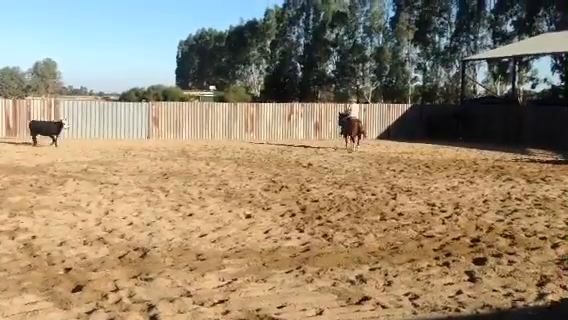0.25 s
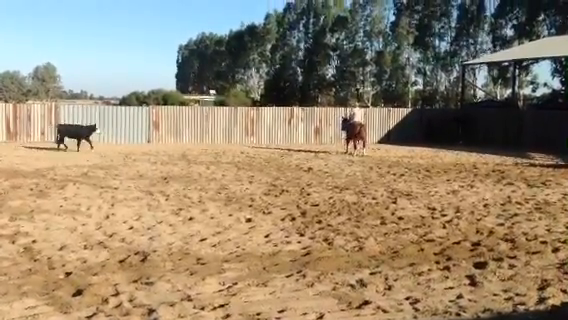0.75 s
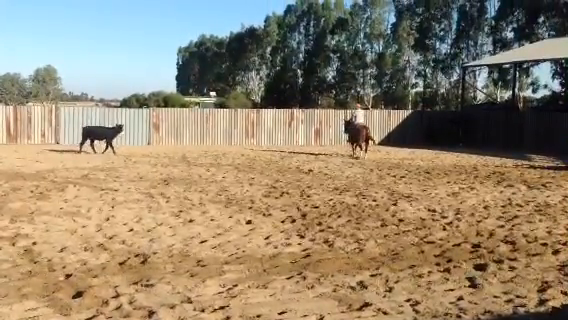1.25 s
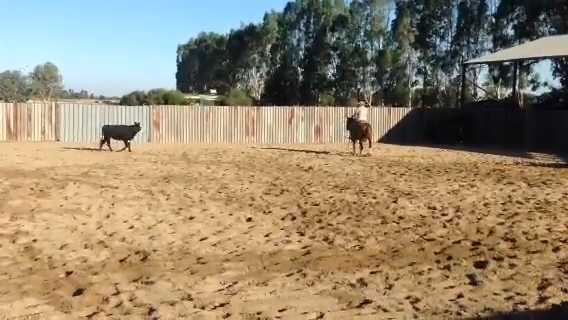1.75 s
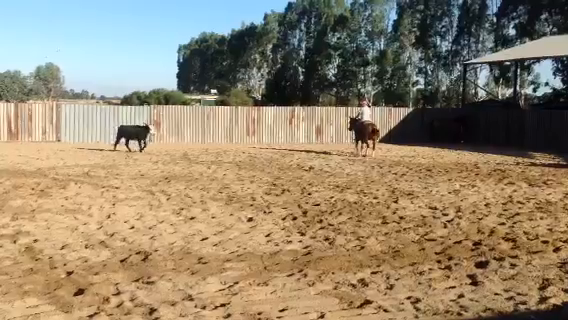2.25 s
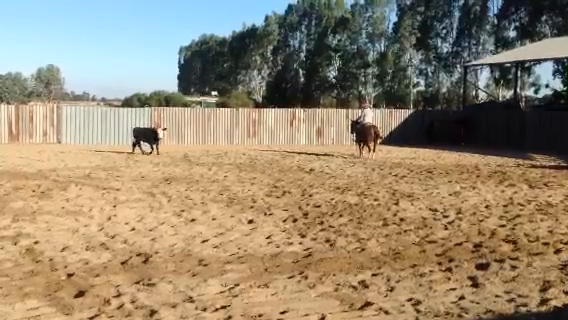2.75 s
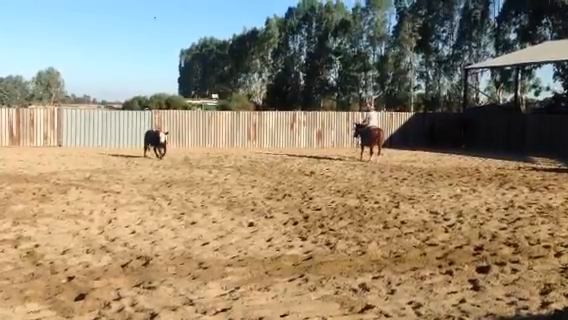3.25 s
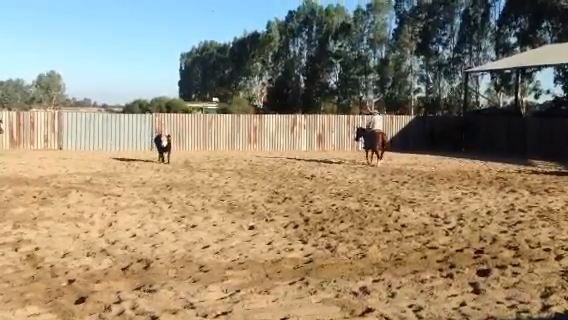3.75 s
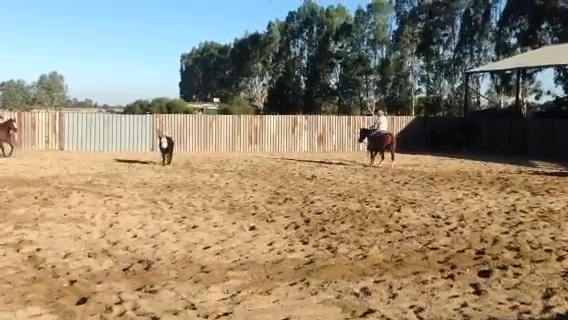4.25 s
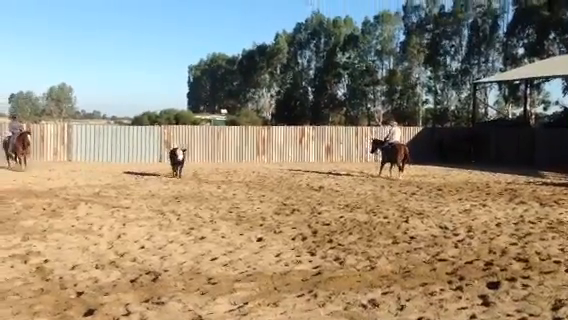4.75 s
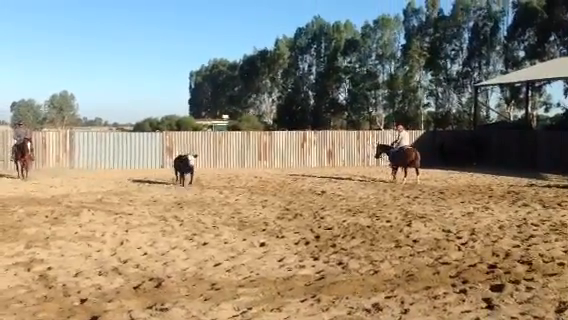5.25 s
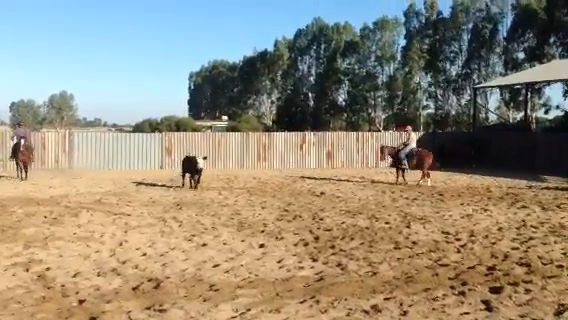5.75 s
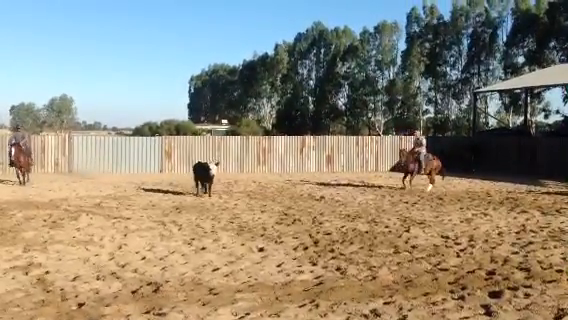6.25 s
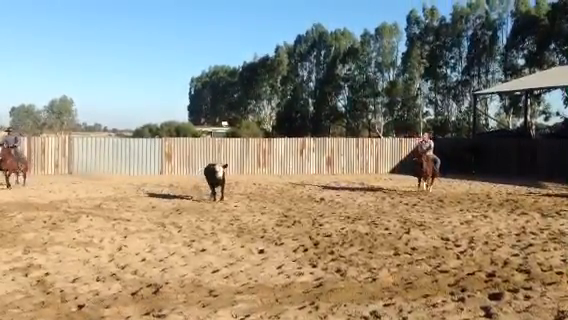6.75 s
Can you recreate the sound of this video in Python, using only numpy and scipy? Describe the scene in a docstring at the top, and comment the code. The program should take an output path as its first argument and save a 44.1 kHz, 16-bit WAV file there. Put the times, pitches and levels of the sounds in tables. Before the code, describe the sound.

Outdoors, a horse whistles out a trembling high neigh that cracks, sags and sputters away into low nickers, followed by quiet air and sparse clicks.

```python
"""Hooves thud in the sand of a fenced arena, over a quiet outdoor hush and a very faint tone near 2 kHz; then a
horse whinnies: a high whistle (jittered oscillator), joined by a lower wavering voice (fraying harmonics),
breaks into squeaks, a groan and a rough rattle (pulses and air in throat resonances) and ends in two soft
nickers. Tack clicks (filtered noise), wood knocks (decaying modes), a small bird chips far off (gliding sine).
All but the thuds and the hush come back from ground and fence by discrete echoes and a thin noise tail."""
import sys
import numpy as np
from scipy import signal
from scipy.fft import rfft, irfft
from scipy.io import wavfile

SR = 44100
rng = np.random.default_rng(int(sys.argv[2]) if len(sys.argv) > 2 else 0)


def generate_wav(sig):
    """Save sig (samples, or channels by samples) to the path in sys.argv[1] as 16-bit PCM at SR."""
    pcm = np.round(np.clip(np.atleast_2d(sig).T, -1, 1) * 32767).astype(np.int16)
    wavfile.write(sys.argv[1], SR, pcm)


N = 309141
TIME = np.arange(N) / SR  # s
FREQ = np.fft.rfftfreq(N, 1 / SR) + 1e-3  # Hz, kept off zero for the divisions
LN_60_DB = np.log(1000)  # a fall of 60 dB, in nepers


def undb(db):
    """Decibels to gain."""
    return 10 ** (np.asarray(db) / 20)


def unit(x):
    """Scale to standard deviation 1."""
    return x / np.std(x)


def track(rows, axis):
    """One column of a curve, read at every sample."""
    rows = np.array(rows)
    return np.interp(TIME, rows[:, 0], rows[:, axis])


def sounding(rows):
    """Gate that is open between the first and last time of a curve."""
    return (TIME > rows[0][0]) * (TIME < rows[-1][0])


def colour_db(points, hz):
    """Read a spectrum on a log-frequency axis."""
    f, db = np.transpose(points)
    return np.interp(np.log(hz), np.log(f), db)


def shape(x, gain):
    """Filter by a gain per frequency, then level to spread 1."""
    return unit(irfft(rfft(x) * gain, N))


def resonance(hz, width):
    """Gain of a steep resonance: a band-pass applied twice."""
    return 1 / (1 + ((FREQ ** 2 - hz ** 2) / (FREQ * width)) ** 2)


def noise():
    """White noise."""
    return rng.standard_normal(N)


def walk(rate, size=16384):
    """Smooth bounded chance with spread 1, changing about rate times a second."""
    slow = irfft(rfft(rng.standard_normal(size)) / (1 + (FREQ[:size // 2 + 1] / rate) ** 4))
    bounded = unit(np.tanh(.5 * unit(slow)))
    return np.interp(TIME, np.linspace(0, TIME[-1], size), bounded)


def turn(hz):
    """Phase of an oscillator, in radians."""
    return 2 * np.pi * np.cumsum(hz) / SR


def ramp(start, length):
    """Rise from 0 to 1 in a straight line."""
    return np.clip((TIME - start) / length, 0, 1)


def envelope(start, attack, hold, release):
    """A straight rise, a hold and an exponential fall."""
    fall = np.exp(-np.clip((TIME - start - attack - hold) / release, 0, 50))
    return ramp(start, attack) * fall


def pulses(phase, scatter_db):
    """One pulse of uneven strength for each turn of a phase."""
    ticks = np.diff(np.floor(phase / (2 * np.pi)), prepend=0)
    return unit(ticks * undb(scatter_db * walk(100)))


def whistle(curve, own_tilt_db, shimmer_db=3, hiss_db=-17):
    """A high oscillator: brighter and clearer at first, then trembling, duller and wrapped in a narrow hiss."""
    # overtones of the whistle: multiple, level/dB
    overtones = [(1, 0), (2, -13.5), (3, -25.5), (4, -28.5), (5, -40)]
    early_rough, late_rough = 0.36, 0.75
    # about half a second into the call the whistle quickly turns rougher
    rough = early_rough + (late_rough - early_rough) * ramp(0.99, 0.06)
    blowing = ramp(0.63, 0.22)
    jitter = 0.009 * walk(70) + 0.009 * blowing * walk(350)
    phase = turn(track(curve, 1) * (1 + rough * jitter))
    # the whistle cracks into a duller register, 6 dB per octave darker
    tilt_db = own_tilt_db - 6 * ramp(0.755, .01)
    tone = np.zeros(N)
    for multiple, db in overtones:
        tone += undb(db + tilt_db * np.log2(multiple)) * np.sin(round(multiple) * phase)
    tone = tone * undb(2.0 + shimmer_db * rough * walk(99))
    hiss = shape(noise(), resonance(1950, 1000) + undb(-21) * resonance(5400, 1200))
    return (tone + undb(hiss_db) * blowing * hiss) * undb(track(curve, 2)) * sounding(curve)


def voice(flap, tilt_db=0.17, rough=.18, fray_rad=.11):
    """The vocal folds quaver in uneven arches; flapping adds faint sidebands."""
    # the lower voice swells in and quavers: t/s, f/Hz, level/dB
    quaver = [(0.86, 685, -53), (0.914, 692.4, -47), (0.948, 656.5, -50), (1.0, 713, -46),
              (1.032, 712, -41), (1.068, 731.5, -46.5), (1.09, 670, -42), (1.122, 685.7, -48.5),
              (1.165, 736.7, -44.5), (1.202, 721.8, -39.5), (1.225, 692.4, -41), (1.252, 655, -45.5),
              (1.296, 684.6, -40), (1.33, 706.7, -38), (1.355, 698, -45), (1.378, 680, -72)]
    # colour of the lower voice, read at each harmonic: f/Hz, level/dB
    colour = [(650, -0.5), (720, -0.5), (1100, -6), (1340, 2.5), (1460, 0.5), (1700, -27), (2140, 11.5),
              (2450, -19), (2850, -2), (3080, -8), (3550, -10.5), (4200, -12.5), (4600, -19.5), (5200, -18),
              (6000, -26.5), (8100, -26.5), (9000, -42)]
    hz = track(quaver, 1) + 4 * walk(30)  # pitch wanders by 4 Hz
    phase = turn(hz * (1 + 0.005 * walk(410) + 0.006 * walk(85)))
    tone = np.zeros(N)
    # each harmonic flickers and frays on its own, the high ones most
    for k in np.arange(1, 13):
        flicker_db = 2 * np.sqrt(k) * walk(31)
        db = colour_db(colour, k * hz) + tilt_db * np.log2(k) + flicker_db
        tone += undb(db) * np.sin(k * phase + fray_rad * (k - 1) * walk(90))
    roughness = 1 + rough * (np.sin(flap) + walk(110))
    return tone * roughness * undb(track(quaver, 2)) * sounding(quaver)


def squeaks(wobble_rad=0.38, overtone_db=-23, arch=.025):
    """The voice catches and breaks in short squeaks, each an arch of pitch under a bell-shaped envelope."""
    # squeaks, timed at their middles: t/s, f/Hz, level/dB, length/s, glide/(Hz/s)
    catches = [(1.115, 2030, -31, .007, -5), (1.168, 2120, -24.5, 0.0073, 0), (1.242, 2020, -25, 0.006, 0),
               (1.276, 2090, -23.5, 0.006, 0), (1.302, 2120, -23.5, 0.01213, 0),
               (1.322, 630, -39, .0094, -3000), (1.363, 1900, -32, 0.024, -7000),
               (1.37, 1230, -35.5, 0.0191, -2000), (1.387, 1755, -33, .022, 0),
               (1.398, 1495, -31.5, 0.04, -1000), (1.413, 3730, -43.5, .05, 3),
               (1.426, 2130, -31, .035, 2000), (1.437, 1760, -25, 0.038, -7),
               (1.465, 1480, -35, 0.019, -3000), (1.468, 2080, -36, .02, -1500),
               (1.476, 1330, -37, 0.023, -3500), (1.524, 3700, -50, 0.046, 4),
               (2.232, 1792, -40.5, 0.008, 0), (2.353, 1850, -39, 0.0056, 0),
               (2.374, 1710, -39.5, 0.0068, -2), (2.692, 718, -44.5, 0.027, -2500),
               (2.837, 1750, -44, 0.0056, 0), (2.843, 3350, -53, 0.019, 0)]
    wobble = wobble_rad * walk(150)
    out = np.zeros(N)
    for at, hz, db, length, glide in catches:
        near = np.abs(TIME - at) < 2 * length
        t = TIME[near] - at
        edge = (2 * t / length) ** 2
        # the pitch droops by the share arch half a length from the middle
        phase = turn(hz * (1 - arch * edge) + glide * t) + wobble[near]
        tone = np.cos(phase) + undb(overtone_db) * np.cos(2 * phase)
        out[near] += undb(db) * np.exp(-edge) * tone
    return out


def groan(start_s=1.318, start_hz=605, sag_hz_per_s=364, level_db=-39, jitter=0.064, shimmer_db=4):
    """The lower, rougher note that the voice collapses to; it sags as it fades."""
    hz = start_hz - sag_hz_per_s * np.clip(TIME - start_s, 0, .5)
    tone = np.sin(turn(hz * (1 + jitter * walk(131)))) * undb(shimmer_db * walk(115))
    return undb(level_db) * tone * envelope(start_s, 0.0097, 0.12, 0.033)


def flutter(hz=250, jitter=.13, rattle_hz=46, rattle_jitter=.26):
    """Slack folds flap unevenly, in slower rattling groups: the phase of each."""
    flap = turn(hz * (1 + jitter * walk(113.5)))
    rattle = turn(rattle_hz * (1 + rattle_jitter * walk(40.7)))
    return flap, rattle


def nicker(flap, rattle, rumble_db=-6, lowest_hz=100, soft_hz=1800, patchy_db=3, wander=.02):
    """Flaps of the folds and puffs of air ring a restless throat; the chest growls, all beating with the rattle."""
    # rattling pushes of air that end the whinny and make the nickers:
    # t/s, hold/s, mouth level/dB, chest flutter level/dB, brightness/(dB/octave)
    pushes = [(1.334, 0.024, -36.5, -60.5, -0.5), (1.415, 0.013, -43.5, -42.5, 2.5),
              (1.488, 0.019, -47.5, -46, 4), (1.54, 0.0041, -52, -40.5, -2), (1.604, 0.013, -51.5, -64, 0),
              (2.186, 0.06, -51.5, -51.5, -2), (2.292, 0.027, -53, -62, 5.5), (2.639, 0.041, -50, -51.5, 0),
              (2.73, 0.031, -56.5, -64, 2), (2.792, 0.045, -52.5, -48, 1.5)]
    # resonances of throat and mouth: f/Hz, width/Hz, level for its width/dB
    throat = [(512, 180, -1), (725, 110, 1), (1350, 310, 0), (1750, 180, -1), (2140, 180, 5),
              (2100, 1340, 0), (2415, 120, 0.5), (3400, 330, -5), (3710, 270, -6), (4220, 1000, -12.5),
              (6370, 2140, -14), (10060, 1100, -38)]
    attack_s, mouth_release_s, chest_release_s = 0.028, 0.069, 0.015
    air_db, rattle_depth, sputter_db = 3, .55, 2
    rattle_top_hz = 3800  # above this the rattle beats the resonances less and less
    _, _, mouth_db, chest_db, tilt_db = np.transpose(pushes)
    centre, width, db = np.transpose(throat)

    beat = np.exp(rattle_depth * np.cos(rattle))
    flaps = shape(pulses(flap, 0.67), 1 / (1 + (FREQ / soft_hz) ** 4))
    puffs = unit(noise() * np.exp(.5 * np.cos(flap)))
    source = rfft(flaps + undb(air_db) * puffs)

    # share of each resonance in each push; the shares of a push add up to its mouth level
    octaves = np.log2(np.clip(centre, 500, 4000) / 1500)
    share = undb(db[:, None] + np.outer(octaves, tilt_db)) * np.sqrt(width[:, None])
    share = share / np.linalg.norm(share, axis=0) * undb(mouth_db)
    breaths = np.array([envelope(at, attack_s, hold, mouth_release_s) for at, hold, *_ in pushes])

    # the resonances sink by a share as the horse relaxes after the whinny
    relaxed = 1 - .055 * ramp(1.7, .8)
    beat = beat * undb(sputter_db * walk(26))  # the air comes in uneven sputters
    mouth = np.zeros(N)
    # each resonance wanders and flutters on its own
    for hz, wide, gain in zip(centre, width, share @ breaths):
        band = unit(irfft(source * resonance(hz, wide), N))
        read_s = np.cumsum(relaxed * (1 + wander * walk(18))) / SR  # reading slower lowers the pitch
        moving = np.interp(read_s, TIME, band)
        beating = beat ** min(1, rattle_top_hz / hz)
        mouth += gain * unit(moving * beating * undb(patchy_db * walk(32)))

    growl = np.sin(turn(198 * (1 + .17 * walk(102.3)))) * undb(2 * walk(34))
    rumble = undb(rumble_db) * shape(noise(), resonance(135, 260))
    chest = shape((growl + rumble) * beat, 1 / (1 + (lowest_hz / FREQ) ** 4))
    heaves = np.array([envelope(at, attack_s, hold, chest_release_s) for at, hold, *_ in pushes])
    return mouth + chest * (undb(chest_db) @ heaves)


def notch(x, notch_hz=3024, width_hz=155):
    """The call is darker in one narrow band near 3 kHz."""
    return irfft(rfft(x) * (1 - resonance(notch_hz, width_hz)), N)


def faint_tones(attack_s=0.015, release_s=0.034, flicker_db=3):
    """Very faint tones near 2 kHz, some long and some short: wavering, flickering sines that drift in pitch."""
    # faint tones: t/s, hold/s, f/Hz, level/dB, glide/(Hz/s)
    tones = [(0, 0.53, 1990, -62.5, 5.5), (1.754, 0.053, 2140, -53, -800), (1.878, 0.038, 2156, -55, -400),
             (1.98, 0.057, 2040, -56, 1202), (2.106, 0.07, 2187, -52, -700),
             (2.204, 0.068, 2060, -53.5, -150), (2.36, .07, 2100, -55.5, -300),
             (2.474, 0.0058, 2060, -58, -400), (2.737, 0.043, 2060, -55, -600),
             (2.957, 0.63, 1958, -64.5, -49)]
    waver = 1 + 0.032 * walk(150) + 0.008 * walk(14)
    notes = np.zeros(N)
    for at, hold, hz, db, glide in tones:
        drifting = hz + glide * np.clip(TIME - at, 0, hold + release_s)
        tone = np.sin(turn(drifting * waver))
        notes += undb(db) * envelope(at, attack_s, hold, release_s) * tone
    return undb(flicker_db * walk(33)) * notes


def hooves(sand_db=-10, attack_s=0.0092, decay_s=0.011, bend=2.11, bend_s=0.0062):
    """Sand damps each thud within a few cycles and adds a dull crunch."""
    # hoof thuds close by: t/s, level/dB, final f/Hz
    thuds = [(0.012, -46.5, 124), (.155, -39.5, 88), (0.17, -29, 136.6), (0.302, -40.5, 106),
             (0.317, -47, 127), (0.347, -36, 100), (1.081, -48.5, 123.5), (3.115, -54.5, 91.4),
             (3.159, -65, 102)]
    sand = undb(sand_db) * shape(noise(), resonance(180, 230))
    out = np.zeros(N)
    for at, db, hz in thuds:
        # a thud starts high and sinks to its pitch as the sand gives
        pitch = hz * (1 + bend * np.exp(-np.abs(TIME - at) / bend_s)) * (TIME > at)
        out += undb(db) * envelope(at, attack_s, 0, decay_s) * (np.sin(turn(pitch)) + sand)
    return out


def tack(gain_db=-2.0, dull_hz=7200, attack_share=0.063):
    """Short dry clicks and scuffs of noise, each with its own brightness; longer ones start more softly."""
    # clicks of tack and hooves: t/s, level ahead of gain_db/dB, centre f/Hz, width/Hz, 60 dB decay/s
    contacts = [(0.847, -38.5, 3760, 6470, 0.048), (2.634, -52, 5330, 4000, 0.13),
                (3.452, -45.5, 940, 1910, 0.19), (4.756, -39, 790, 1870, 0.017),
                (4.831, -41.5, 1500, 7040, 0.014), (5.145, -48, 6200, 3500, 0.036),
                (6.16, -54.5, 1870, 1100, 0.52), (6.980, -39, 1700, 6000, 0.017)]
    out = np.zeros(N)
    for at, db, hz, width, t60 in contacts:
        click = shape(noise(), resonance(hz, width) / (1 + (FREQ / dull_hz) ** 4))
        out += undb(db + gain_db) * click * envelope(at, attack_share * t60, 0, t60 / LN_60_DB)
    return out


def knock(crack_db=-9, crack_s=0.0029, dull_hz=6200, lowest_hz=250):
    """A hard knock and its bounces, followed by a reflection, ring a few short woody modes, each hit with a
    crack of noise."""
    # hits of the knock and its quick bounces, then a reflection about 20 ms later: t/s, level/dB
    contacts = [(5.4824, -50), (5.4847, -38), (5.492, -50), (5.503, -48.5)]
    # modes of the wood: f/Hz, level/dB, 60 dB decay/s
    modes = [(950, -17, .02), (1990, -6, 0.035), (2070, -2.5, 0.017), (2600, -6, 0.017), (3120, -5, 0.015),
             (3770, -2, 0.011), (4470, -4, 0.02), (6000, -12, 0.021)]
    crack = undb(crack_db) * shape(noise(), resonance(1800, 6000))
    t = TIME[:SR // 4]
    ring = np.zeros(len(t))
    for hz, mode_db, t60 in modes:
        ring += undb(mode_db) * np.cos(2 * np.pi * hz * t) * np.exp(-LN_60_DB * t / t60)
    out = np.zeros(N)
    for at, db in contacts:
        start = int(at * SR)
        span = slice(start, start + len(t))
        out[span] += undb(db) * (ring + crack[span] * np.exp(-t / crack_s))
    band = signal.butter(2, [lowest_hz, dull_hz], "band", fs=SR, output="sos")
    return signal.sosfilt(band, out)


def bird():
    """Far-off chips: a sine holds its note, drops and flicks up again."""
    # chips: t/s, level/dB
    calls = [(0.071, -78), (3.156, -72), (4.904, -78), (5.755, -81), (6.584, -77)]
    # shape of one chip: t after its start/s, f/Hz, level added to that of the chip/dB
    chip = [(0, 6120, 2), (.016, 6150, 22), (.028, 5900, 20.5), (0.035, 5060, 14), (.045, 4040, 9),
            (.053, 4870, 19), (.06, 5200, -24)]
    s, hz, db = np.transpose(chip)
    out = np.zeros(N)
    for at, level_db in calls:
        t = TIME - at
        gain = (t > 0) * (t < s[-1]) * undb(level_db + np.interp(t, s, db))
        out += gain * np.sin(turn(np.interp(t, s, hz)))
    return out


def hush(level_db=-55.5, flicker_db=0.87):
    """Distant air and trees as shaped noise: the lows waver slightly, the hiss stays smooth."""
    # colour of the hush: f/Hz, relative level per Hz/dB
    colour = [(18, -81), (30, -39), (75, -20), (113, -4.5), (253, 1.5), (497, -3), (567, -1), (859, -1.5),
              (1170, -2.5), (1370, -2.5), (2080, -8.5), (3590, -12), (5880, -12), (7430, -18),
              (15000, -26.5)]
    air = shape(noise(), undb(colour_db(colour, FREQ)))
    lows = irfft(rfft(air) / (1 + (FREQ / 1500) ** 2), N)
    hiss = air - lows
    return undb(level_db) * (hiss + lows * undb(flicker_db * walk(50)))


def arena(x, t60=0.5, wet_db=-13, dull_hz=5000):
    """A few hard reflections, then a thin scatter from trees and roof."""
    # reflections from ground and fence: delay t/s, level/dB
    reflections = [(.0125, -10), (.027, -12.5), (.061, -19), (.18, -18.5)]
    scatter = shape(noise(), 1 / (1 + (FREQ / dull_hz) ** 2))
    tail = scatter * np.exp(-LN_60_DB * TIME / t60) * (TIME > .015)
    response = undb(wet_db) * tail / np.sqrt(np.sum(tail ** 2))
    for delay, db in reflections:
        response[int(delay * SR)] += undb(db)
    return signal.fftconvolve(x, response)[:N]


def scene():
    """Horse and bird ring in the arena; squeaks, clicks and knocks sit drier, thuds and hush fully dry."""
    # the high whistle that starts the call alone: t/s, f/Hz, level/dB
    first_curve = [(0.5, 1935, -67), (0.568, 2050, -35), (0.602, 2110, -54), (0.614, 2070, -37.5),
                   (0.745, 2031, -32.5), (.763, 1997, -39), (0.767, 1945, -25.5), (.802, 1950, -25),
                   (0.825, 1957, -27), (.875, 1975, -31.5), (.898, 1998, -33), (.92, 2010, -36.5),
                   (0.97, 2022, -32), (1.07, 2010, -50), (1.105, 2025, -34), (1.14, 2055, -46),
                   (1.2, 2040, -47), (1.26, 1945, -30.5), (1.3, 2000, -40), (1.35, 1990, -47),
                   (1.39, 1950, -71)]
    # a second whistle splits off just above and beats with the first: t/s, f/Hz, level/dB
    second_curve = [(0.94, 2100, -51), (0.98, 2135, -36), (1.035, 2158, -31), (1.065, 2160, -43),
                    (1.095, 2150, -28.5), (1.125, 2160, -37), (1.16, 2200, -33.5), (1.21, 2200, -44),
                    (1.245, 2090, -35), (1.27, 2085, -39), (1.3, 2135, -44), (1.335, 2100, -51),
                    (1.38, 2080, -66)]
    flap, rattle = flutter()
    whistles = whistle(first_curve, own_tilt_db=-2) + whistle(second_curve, own_tilt_db=-5)
    call = notch(whistles + voice(flap) + groan() + nicker(flap, rattle))
    far = call + faint_tones() + bird()
    catches = squeaks()
    clicks = tack() + knock()
    echo = arena(far + undb(-7.5) * catches + undb(-4) * clicks)
    mix = undb(-1.5) * far + catches + echo + clicks + hooves() + hush()
    return mix[None]


def record(dry, top_hz=15330):
    """The recorder behind the microphone cuts the top steeply."""
    return signal.sosfilt(signal.ellip(12, .1, 70, top_hz, fs=SR, output="sos"), dry)


dry = scene()
out = record(dry)
generate_wav(out)
```